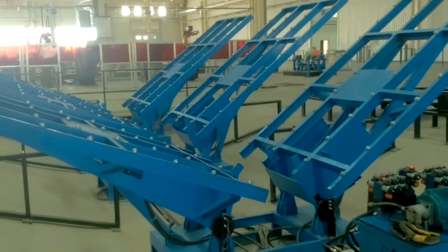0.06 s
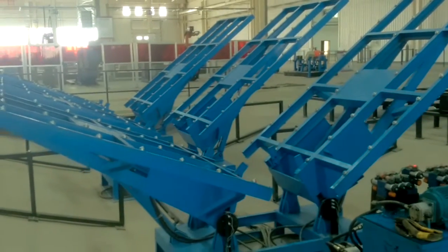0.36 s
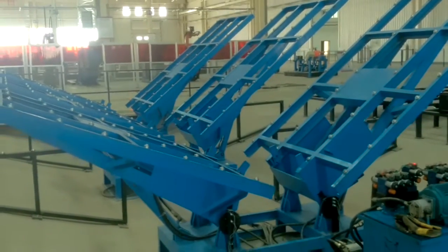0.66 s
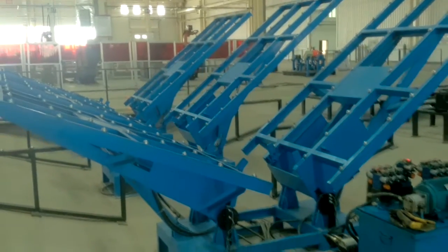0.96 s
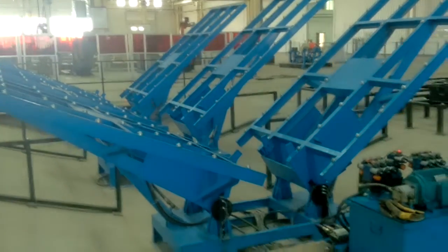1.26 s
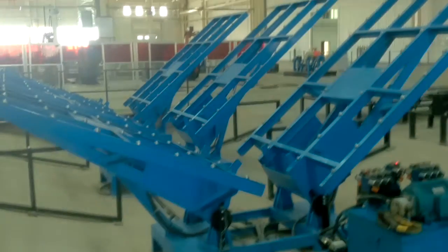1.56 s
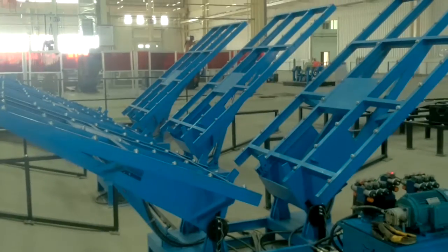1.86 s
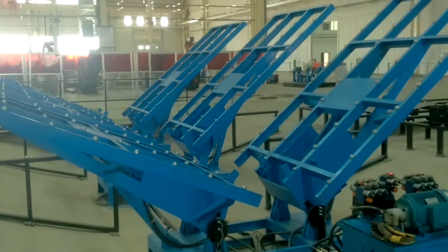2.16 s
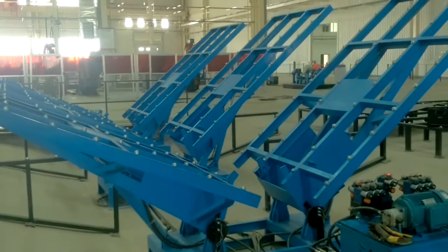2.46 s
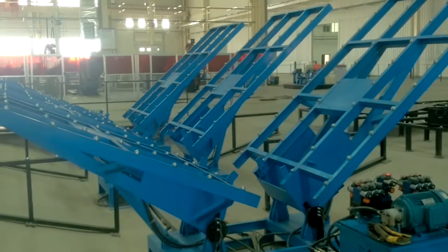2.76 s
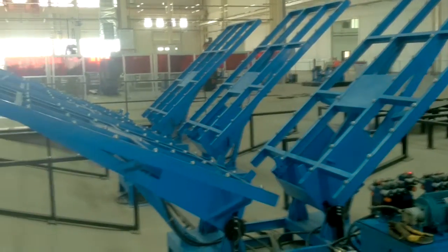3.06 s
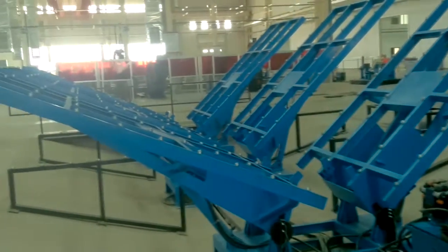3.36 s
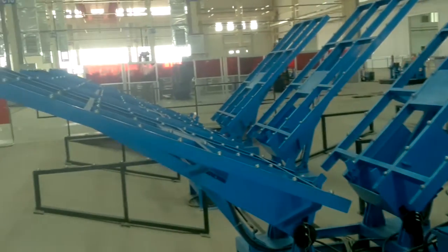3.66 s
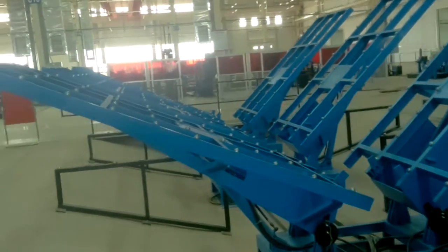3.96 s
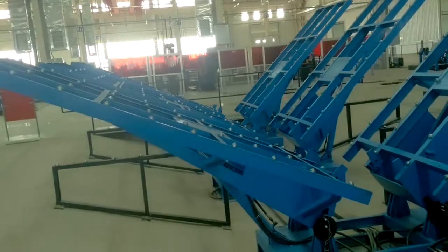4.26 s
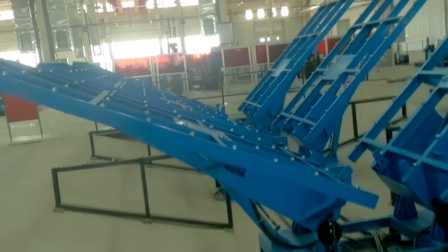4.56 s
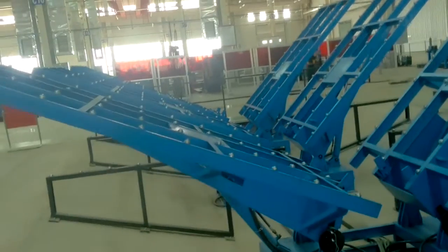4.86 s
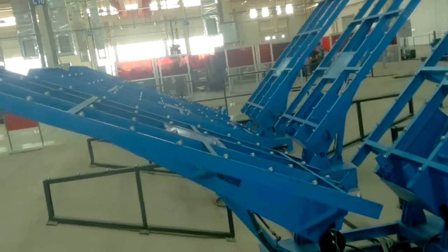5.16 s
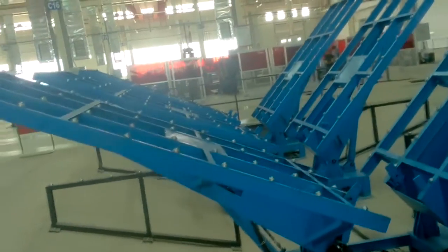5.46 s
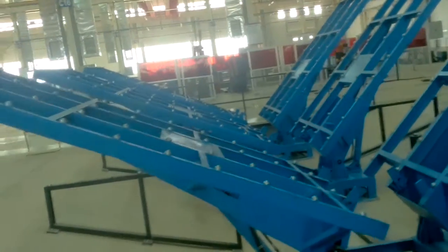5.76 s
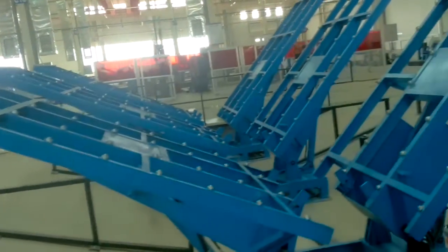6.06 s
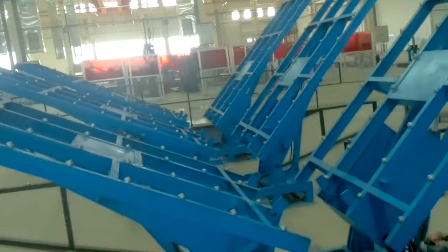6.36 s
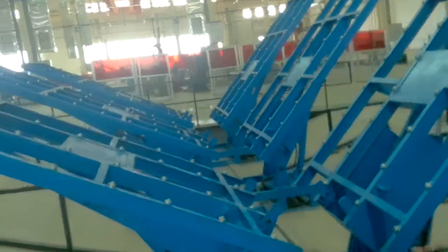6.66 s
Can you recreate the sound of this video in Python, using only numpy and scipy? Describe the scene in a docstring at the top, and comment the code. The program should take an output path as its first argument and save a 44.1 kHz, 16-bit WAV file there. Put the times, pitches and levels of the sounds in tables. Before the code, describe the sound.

The steady whine, hum and hiss of a motor-driven hydraulic pump lifting a steel frame in a factory, interrupted by a low click.

```python
"""Hydraulic power pack in a factory hall

The pack runs steadily while its arms lift a steel frame. A four-pole motor turns a ten-tooth pump:
tooth tones whine over a buzz of shaft orders, oil hisses in spurts, valves and pipes sing.
A hand-held stereo pair edges 0.8 m closer through the hall's standing waves.
One low click strikes the left microphone; a faint one follows on both."""
import sys
import numpy as np
from scipy import signal
from scipy.fft import rfft, irfft, next_fast_len
from scipy.io import wavfile
from scipy.ndimage import uniform_filter1d, map_coordinates

SR = 44100
rng = np.random.default_rng(int(sys.argv[2]) if len(sys.argv) > 2 else 0)


def bounce(signal):
    """Save signal as a 16-bit WAV file at the path given by the first command-line argument."""
    frames = np.transpose(np.atleast_2d(signal))
    limited = np.clip(frames, -1, 1)
    pcm = np.round(limited * 32767).astype(np.int16)
    wavfile.write(sys.argv[1], SR, pcm)


N = 295911
SHAFT_HZ, RISE_HZ_PER_S = 24.62, .0103  # the shaft gains a little speed as the load eases
TOP_HZ = 14300  # band limit of the microphones
SILENT_DB = -120

# the microphones' way towards the pump: t/s, distance covered/m
APPROACH = [(0, 0), (.9, .057), (1.6, .159), (3.1, .191), (3.55, .297), (3.9, .37), (4.3, .39), (4.9, .607),
            (5.5, .705), (6.1, .795), (6.7, .825)]
# likeness of the noise at the two microphones: f/Hz, correlation (-1 to 1)
CORRELATION = [(30, .6), (120, .95), (380, .95), (600, .4), (1000, .55), (1350, .1), (1520, -.8),
               (1760, -.87), (2050, -.15), (3200, .3), (4100, -.1), (7000, 0)]
# room tone of the hall: f/Hz, relative density/dB
ROOM_TONE = [(25, -69), (50, -71), (75, -82), (110, -78.5), (250, -77.5), (370, -74), (540, -83),
             (720, -73.5), (1000, -75.5), (1150, -76), (1300, -75), (1450, -74.5), (1650, -75),
             (2500, -120)]
# low clicks on the microphones: t/s, level/dB, decay/s, low-pass f/Hz, right against left/dB
MIC_CLICKS = [(5.0104, -13.5, .07, 2500, -45), (5.607, -31, .007, 170, -3)]

# valves and pipes singing: centre t/s, length/s, f/Hz, width/Hz, left, right relative density/dB
WHISTLES = [(.45, 1, 4570, 60, -61, -68), (.5, 1.3, 5690, 170, -57, -80), (.65, .5, 4090, 50, -59, -68),
            (1.35, .4, 4560, 120, -66, -63), (1.5, .3, 6820, 60, -55, -80), (1.9, .8, 6270, 150, -64, -66),
            (2.3, 2, 8060, 130, -61, -76), (2.55, 2.5, 5810, 100, -54, -80),
            (2.6, 1.7, 9800, 200, -76, -68), (3.05, .45, 6820, 70, -55, -80),
            (3.65, .6, 9560, 160, -57.5, -80), (3.7, .5, 5690, 160, -57, -76),
            (3.8, 5.5, 5575, 20, -51.5, -68), (5.1, 2.8, 5412, 30, -59, -72),
            (3.8, 5.5, 6295, 40, -59, -70), (4.1, .7, 5830, 90, -57, -76), (4.1, 1.2, 4050, 130, -66, -65),
            (4.2, 1, 10120, 140, -60, -80), (4.3, 3, 9520, 130, -60, -80), (4.6, 1.2, 7980, 400, -73, -69),
            (4.75, .45, 5860, 150, -52, -78), (5.15, .5, 10120, 250, -64, -78),
            (5.25, .8, 8600, 500, -66, -69), (5.4, 1, 4060, 130, -63, -62), (5.55, .35, 5580, 26, -44, -64),
            (5.82, .5, 9590, 240, -53.5, -78), (5.85, .5, 8860, 300, -61.5, -74),
            (6.05, .6, 6120, 250, -57, -66), (6.08, .25, 5600, 130, -53, -63),
            (6.35, .7, 8750, 550, -74, -65), (6.35, .6, 9700, 500, -78, -68),
            (6.55, .5, 6260, 300, -52.5, -74), (6.45, .9, 7200, 900, -64, -74),
            (6.45, .6, 1340, 100, -68, -67), (6.5, .8, 4200, 700, -67, -69)]
# oil rushing through the valves: f/Hz, left, right relative density/dB
OIL_SPECTRUM = [(1610, -79.5, -73), (1710, -57.5, -67), (1780, -73, -73), (2320, -73, -72.5),
                (3030, -69.5, -74.5), (3140, -69, -69.5), (3900, -68.5, -71), (4970, -67, -73),
                (6350, -65.5, -73.5), (6550, -66, -76), (7400, -69, -73.5), (8500, -67.5, -72.5),
                (10130, -69, -74), (13000, -78.5, -69.5), (14100, -88, -84)]
# slow rise of that hiss: t/s, level/dB
OIL_LEVEL = [(0, -1), (1, -1), (3.6, -0.73), (5, 0), (6, 0.8), (6.7, 1.5)]
# peaks and dips of the pipework: f/Hz, width/Hz, left, right gain/dB
PIPE_RESONANCES = [(2720, 90, 3, 2), (2865, 120, -10, -6), (3090, 100, -3, -2), (3340, 120, -3, -2),
                   (4220, 120, -4, -2), (4740, 90, -3, -2), (5300, 200, -2, -3), (5737, 300, 3, 1),
                   (7080, 200, 2, 1), (7700, 300, -1.5, 0), (9530, 170, 2.5, 0), (10150, 230, 3, 1),
                   (11450, 500, 3.5, 1)]
# how the pump beams at the microphones: f/Hz, left, right gain/dB, left, right change/(dB per m)
PUMP_BEAM = [(170, -4, -10, -9, -1), (520, -11, -17.5, 18, 20), (800, 10, -7, -4.5, 3),
             (1270, -3.5, -3.5, -8, -1), (1960, 3.5, 1, -1.5, 6), (3370, -1.5, -2, 1.5, 0),
             (6550, -0.16, 0.5, 2.5, -1), (9840, 1, 0, 3.5, 0.5), (12100, -2, -2.5, 2.5, 0)]

# shaft orders as casing and pipes radiate them: f/Hz, left, right relative level/dB
BUZZ_SPECTRUM = [(300, -70, -72), (560, -66.5, -69), (690, -68, -59), (1150, -70, -54), (1340, -66, -62.5),
                 (1560, -60.5, -59.5), (1680, -56, -70.5), (2000, -53, -60.5), (2310, -60.5, -65),
                 (2600, -64.5, -64.5), (3500, -58.5, -55.5), (3780, -51, -57), (4430, -57, -55.5),
                 (4900, -58, -59.5), (6120, -49.5, -66), (6800, -59, -77), (13600, -65.5, -65.5)]
# phase by which buzz and hum lead at the left microphone: f/Hz, lead/rad
LEFT_LEAD = [(350, 0), (700, .8), (1000, .3), (1300, 1), (1520, 2.8), (1800, 2.8), (2200, 2.2), (3000, 0)]
# scatter of that lead from order to order: f/Hz, spread/rad
LEAD_SCATTER = [(400, .05), (600, .5), (1300, .5), (1520, .15), (1780, .15), (2100, 1.4), (4000, 2.2)]
# motor hum and pump side tones: shaft order, relative level/dB far left, far right, near left, near right
HUM_ORDERS = [(4, -61.0, -61.5, -57.0, -57.5), (5, -55.5, -55.5, -56.5, -57.5),
              (6, -65.5, -65.5, -61.5, -61.5), (8, -61.5, -61.5, -63.0, -63.0),
              (9, -58.0, -59.5, -54.0, -53.5), (11, -63.0, -63.0, -61.5, -62.0),
              (13, -60.0, -62.0, -59.0, -58.0), (14, -54.5, -54.0, -59.5, -58.5),
              (17, -64.5, -61.0, -54.5, -54.0), (18, -60.5, -59.5, -65.5, -64.5),
              (19, -54.0, -50.0, -49.0, -46.0), (20, -59.5, -54.5, -54.0, -50.0),
              (28, -56.5, -59.5, -59.5, -56.5), (29, -59.5, -58.5, -55.0, -53.0), (32, -49, -58, -56, -58),
              (33, -49.5, -52.0, -50.5, -53.5), (35, -56.0, -55.5, -60.0, -57.5),
              (37, -55, -57, -52.5, -51.5), (38, -51.0, -53.0, -51.5, -53.0),
              (39, -53.5, -51.5, -52.0, -55.0), (42, -62.5, -58, -46.5, -48.5),
              (48, -60.0, -53.0, -59.0, -55.5), (51, -58.5, -51.0, -52.0, -49.5),
              (54, -59.0, -56.0, -58.0, -57.0), (55, -64.0, -55.5, -57.0, -49.5),
              (67, -50.5, -51.5, -46.0, -45.5), (68, -47.0, -49.5, -46.5, -46.5),
              (71, -48.0, -52.0, -48.0, -48.0), (73, -47.5, -50.5, -47.5, -47.5),
              (78, -48.5, -54.5, -48.0, -44.5), (80, -50.5, -48.0, -52.5, -43.0),
              (81, -49.5, -48.5, -54.0, -47.0), (83, -47.5, -52.5, -50.0, -46.5),
              (90, -52.0, -57.5, -56.5, -55.0), (93, -47.5, -49.5, -52.0, -52.5),
              (100, -51.0, -55.0, -48.5, -53.0), (101, -53.0, -52.0, -53.5, -54.5),
              (111, -55, -60, -49.5, -52.5), (150, -56, -59, -55, -55), (161, -54, -55, -50.5, -54),
              (164, -53, -55, -47, -53), (166, -51, -57, -47.5, -51), (203, -53, -61, -51, -59),
              (234, -45, -62, -52, -64), (236, -43.5, -62, -47, -62), (238, -52, -64, -44.5, -61),
              (255, -48, -60, -45, -57), (277, -48, -64, -54, -64)]

# tooth tones in the standing waves, named by shaft order: t/s, left, right level/dB, left lead/rad
TOOTH_10 = [(0.0, -41.7, -43.8, -0.3), (0.9, -41.1, -43.4, -0.2), (1.8, -37.6, -39.3, -0.0),
            (4.25, -37.4, -37.9, 0.0), (4.5, -38.4, -39.8, 0.1), (5.15, -36.5, -38.5, -0.0),
            (5.5, -35.7, -36.6, 0.1), (5.8, -36.5, -37.8, 0.2), (6.35, -34.2, -36.8, 0.1),
            (6.69, -31.9, -33.7, 0.0)]
TOOTH_15 = [(0, -49, -48.7, .1), (4, -47, -46.7, .1), (4.65, -53, -51, .1), (4.85, -45, -44, .1),
            (5.1, -47.5, -47, .2), (5.35, -43.5, -42.5, .2), (6.3, -43.3, -42.7, .2), (6.7, -47, -46, .2)]
TOOTH_30 = [(0.01, -36.8, -40.4, 1.1), (1.05, -37.4, -39.9, 0.8), (1.35, -39.2, -42.9, 1.0),
            (3.0, -37.6, -43.5, 1.2), (3.46, -37.5, -39.9, 1.2), (3.91, -41.2, -36.7, 1.6),
            (4.21, -40.0, -38.9, 2.4), (4.5, -39.0, -43.8, 2.1), (4.96, -40.0, -38.8, 2.1),
            (5.25, -36.3, -39.3, 1.8), (5.55, -44.1, -36.4, 1.8), (6.3, -46.6, -45.0, 3.2),
            (6.7, -58.7, -42.8, 3.7)]
TOOTH_40 = [(0.01, -49.6, -38.2, 1.2), (0.3, -41.0, -36.0, 0.2), (0.6, -36.9, -41.2, 0.2),
            (1.05, -37.0, -46.8, 1.1), (1.51, -36.5, -38.8, 0.0), (2.56, -37.4, -40.6, 0.1),
            (3.31, -39.0, -36.5, 0.1), (3.6, -50.1, -36.0, 1.2), (3.75, -40.7, -40.0, 2.6),
            (3.91, -38.5, -46.8, 1.6), (4.21, -45.8, -40.8, -0.0), (4.36, -48.1, -42.8, 2.3),
            (4.5, -37.9, -41.8, 1.3), (4.96, -39.8, -34.9, 1.5), (5.41, -37.7, -42.1, 2.1),
            (5.71, -38.1, -40.7, 1.6), (5.86, -33.6, -37.2, 1.3), (6.7, -35.3, -37.6, 1.0)]
TOOTH_50 = [(0.0, -47.7, -53.3, 1.1), (0.6, -57.9, -52.7, 1.5), (1.2, -53.6, -55.3, 0.1),
            (1.6, -55.9, -49.9, 2.0), (3.1, -49.8, -49.8, 1.6), (4.5, -53.5, -52.1, 0.9),
            (5.0, -61.2, -64.5, 3.5), (5.2, -50.7, -52.0, 2.8), (6.69, -44.6, -41.7, 0.8)]
# the clearest side tones beside them, same columns
SIDE_31 = [(0.01, -45.0, -50.9, 1.0), (2.71, -48.4, -44.9, 1.2), (3.46, -46.4, -46.5, 2.2),
           (4.21, -47.2, -53.5, 2.1), (4.5, -42.4, -53.3, 1.7), (4.8, -45.2, -46.6, 1.4),
           (5.25, -48.1, -50.6, 3.3), (5.86, -50.7, -57.3, 2.8), (6.7, -50.4, -54.2, 8.3)]
SIDE_34 = [(0.01, -49.8, -53.9, 0.6), (3.0, -46.9, -50.9, -0.3), (3.75, -53.2, -54.7, 1.0),
           (3.91, -52.6, -65.8, 0.7), (4.36, -49.1, -52.6, 0.7), (4.96, -47.7, -52.6, 1.1),
           (6.0, -53.6, -56.3, 1.4), (6.7, -49.8, -53.4, 0.3)]
SIDE_36 = [(0.01, -51.6, -48.6, 0.3), (1.05, -49.5, -61.1, 0.6), (2.1, -47.9, -52.0, 0.3),
           (3.46, -53.9, -53.3, 0.0), (4.05, -48.6, -58.6, -5.5), (4.5, -48.5, -55.2, -7.6),
           (5.55, -57.1, -54.8, -3.7), (5.71, -54.5, -58.9, -6.5), (6.7, -48.2, -45.0, -5.5)]
SIDE_41 = [(0.01, -47.8, -53.0, 1.1), (0.6, -54.4, -49.8, 0.8), (2.71, -53.4, -48.1, 0.1),
           (3.91, -52.1, -51.2, 1.5), (4.36, -50.5, -49.0, 0.3), (4.5, -50.4, -52.1, 3.3),
           (4.96, -44.0, -47.3, 0.4), (5.25, -51.4, -50.7, 2.2), (5.86, -44.7, -49.5, 1.3),
           (6.7, -48.8, -50.6, 1.0)]
SIDE_43 = [(0.01, -53.9, -55.4, 1.7), (0.6, -49.7, -45.8, 1.2), (1.96, -51.0, -49.6, 1.4),
           (2.41, -61.5, -50.4, 0.8), (3.31, -48.8, -49.5, 1.3), (4.05, -53.7, -52.0, 1.3),
           (5.41, -46.8, -50.8, 1.6), (6.7, -53.7, -51.6, 0.3)]
SIDE_69 = [(0.01, -40.7, -40.6, -3.2), (0.46, -44.5, -47.0, -3.0), (1.21, -38.6, -41.1, -3.0),
           (2.85, -42.8, -47.1, -3.0), (3.46, -41.4, -41.6, -2.9), (4.66, -46.0, -45.9, -2.8),
           (5.11, -50.3, -50.4, -2.8), (6.16, -38.7, -38.7, -3.1), (6.7, -42.0, -41.9, -2.6)]
# the tones of the whine: shaft order, its course from above
WHINE_TONES = [(10, TOOTH_10), (15, TOOTH_15), (30, TOOTH_30), (31, SIDE_31), (34, SIDE_34), (36, SIDE_36),
               (40, TOOTH_40), (41, SIDE_41), (43, SIDE_43), (50, TOOTH_50), (69, SIDE_69)]


def amp(db):
    """Decibels to gain."""
    return 10 ** (np.asarray(db) / 20)


def unit(x):
    """x at rms 1."""
    return x / np.sqrt(np.mean(x ** 2) + 1e-20)


def along(rows, hz):
    """Each column of a table read on a log-frequency axis."""
    row_hz, *columns = np.transpose(rows)
    return np.array([np.interp(np.log(hz + 1), np.log(row_hz + 1), column) for column in columns])


def curves(rows):
    """One value per sample for each column after the time."""
    times, *columns = np.transpose(rows)
    return np.array([np.interp(np.arange(N) / SR, times, column) for column in columns])


def filtered(x, response):
    """x times a response of frequency."""
    size = next_fast_len(N + SR // 2)
    return irfft(rfft(x, size) * response(np.fft.rfftfreq(size, 1 / SR)), size)[..., :N]


def below(x, edge, order):
    """Smooth fall from 1 to 0, halfway at the edge."""
    return 1 / (1 + (x / edge) ** order)


def bell(x, centre, width, order):
    """A peak of 1 at the centre, with the given full width at half height."""
    return below(np.abs(x - centre), width / 2, order)


def wobble(rate):
    """A smooth random curve, rate knots a second."""
    knots = rng.standard_normal(int(N * rate / SR) + 4)
    return map_coordinates(knots, [np.arange(N) * rate / SR])


def rush(spectrum, patchy_db):
    """Noise in slowly shifting patches, partly alike at the two microphones."""
    def mid_side_gains(hz):
        spread = np.arccos(np.clip(along(CORRELATION, hz)[0], -1, 1)) / 2
        return np.array([np.cos(spread), np.sin(spread)])

    noise = signal.stft(rng.standard_normal((2, N)), nperseg=1024)[2]
    patches = uniform_filter1d(rng.standard_normal(noise.shape[1:]), size=2, axis=0)  # across frequency
    patches = uniform_filter1d(patches, size=36, axis=1)  # across time
    patch_gain = unit(amp(patchy_db * unit(patches)))
    pair = signal.istft(noise * patch_gain, nperseg=1024)[1][:, :N]
    mid, side = filtered(pair, mid_side_gains)
    left_right = np.array([mid + side, mid - side])
    return filtered(left_right, lambda hz: amp(along(spectrum, hz)) * np.sqrt(SR / 2))


def hall_murmur(travel, level_db=-1.7, db_per_m=.5):
    """The hall's low room tone, slightly louder towards the pump."""
    return amp(level_db + db_per_m * travel) * rush(ROOM_TONE, patchy_db=2.5)


def mic_clicks():
    """A sudden step at the microphone leaks away and swings slowly back."""
    out = np.zeros((2, N))
    for start, db, decay, bright_hz, right_db in MIC_CLICKS:
        age = (np.arange(N) / SR - start) / decay
        step = (age > 0) * (1 - age) * np.exp(-np.abs(age))
        out += amp([[db], [db + right_db]]) * filtered(step, lambda hz: below(hz, bright_hz, order=2))
    return out


def whistles(level_db=-1.8):
    """Narrow resonances of valves and pipes, stirred by the flow, swell and fade."""
    hz, t, noise = signal.stft(rng.standard_normal((2, N)), SR, nperseg=2048)
    power = np.zeros(noise.shape)
    for centre_s, length, centre_hz, width, *sides_db in WHISTLES:
        swell = np.outer(bell(hz, centre_hz, width, order=3), bell(t, centre_s, length, order=6))
        power += np.multiply.outer(amp(sides_db), swell) ** 2
    return amp(level_db) * signal.istft(noise * np.sqrt(power * SR / 2), nperseg=2048)[1][:, :N]


def oil_hiss(low_cut_hz=1400):
    """Oil rushes through the valves, a little louder towards the end."""
    noise = rush(OIL_SPECTRUM, patchy_db=2.1)
    return amp(curves(OIL_LEVEL)) * filtered(noise, lambda hz: 1 - below(hz, low_cut_hz, order=12))


def oil_spurts(angle, tooth_depth=.38, sharpness=2.5, shaft_depth=.2, flutter_db=.25):
    """Gain of the hiss: each of the ten teeth pushes a spurt of oil; the spurts swell once a turn."""
    tooth = ((1 + np.cos(10 * angle)) / 2) ** sharpness
    shaft = ((1 + np.cos(angle - 1.2)) / 2) ** 2
    flutter = amp(flutter_db * wobble(rate=35))
    return unit((1 + tooth_depth * tooth) * (1 + shaft_depth * shaft) * flutter)


def pipework(hz):
    """Gain of the pipework's resonances at each microphone."""
    return amp(sum(np.outer(sides_db, bell(hz, centre, width, order=2))
                   for centre, width, *sides_db in PIPE_RESONANCES))


def pump_beam(x, travel, sway_db=.35):
    """The pump's colour passes from far to near as the hand-held pair sways closer."""
    def heard_after(metres):
        return filtered(x, lambda hz: amp(along(PUMP_BEAM, hz)[:2] + metres * along(PUMP_BEAM, hz)[2:]))

    nearness = travel / travel.max()
    sway = amp(sway_db * np.array([wobble(rate=7), wobble(rate=7)]))
    return sway * ((1 - nearness) * heard_after(0) + nearness * heard_after(travel.max()))


def shaft_orders(angle, travel, far_db, near_db, drift_rad, shift_db, places, turn_size=8192):
    """Shaft orders repeat one pattern every turn; the hall reshuffles it along the microphones' path."""
    hz = np.arange(1, far_db.shape[1] + 1) * SHAFT_HZ
    # each microphone stands at its own place in the standing waves
    lead = along(LEFT_LEAD, hz) + along(LEAD_SCATTER, hz) * rng.standard_normal(len(hz))
    phase = rng.uniform(0, 2 * np.pi, len(hz)) + lead * [[.5], [-.5]]
    sensitivity = np.sqrt(hz / TOP_HZ)  # short waves change fastest as the microphones move
    place = travel / travel.max() * (places - 1)
    turn_index = angle / (2 * np.pi) % 1 * turn_size
    out = np.zeros((2, N))
    for i in range(places):
        phase = phase + drift_rad * sensitivity * rng.standard_normal(len(hz))
        level_db = far_db + (near_db - far_db) * i / (places - 1)
        gain = amp(level_db + shift_db * sensitivity * rng.standard_normal(phase.shape))
        spectrum = np.pad(gain * np.exp(1j * phase), ((0, 0), (1, 0)))
        one_turn = irfft(spectrum, turn_size) * turn_size / 2
        here = np.abs(place - i) < 1
        crossfade = 1 - np.abs(place[here] - i)
        turning = [np.interp(turn_index[here], np.arange(turn_size), side) for side in one_turn]
        out[:, here] += crossfade * np.array(turning)
    return out


def tooth_buzz(angle, travel, uneven_db=2.2, tooth_db=1):
    """Unequal teeth fill in the shaft orders between those of the whine and the hum."""
    orders = np.arange(1, int(TOP_HZ / SHAFT_HZ))
    levels = along(BUZZ_SPECTRUM, orders * SHAFT_HZ) + uneven_db * rng.standard_normal(len(orders))
    levels += tooth_db * (orders % 10 == 0)  # multiples of the tooth rate stand out
    levels[:, np.isin(orders, [row[0] for row in WHINE_TONES + HUM_ORDERS])] = SILENT_DB
    return shaft_orders(angle, travel, levels, levels, drift_rad=1.1, shift_db=6, places=20)


def motor_hum(angle, travel, level_db=-.67):
    """The clear side tones of motor and pump, each swelling and fading along the microphones' path."""
    levels = np.full((4, int(TOP_HZ / SHAFT_HZ)), SILENT_DB, dtype=float)
    for order, *dbs in HUM_ORDERS:
        levels[:, order - 1] = dbs
    far, near = levels[:2], levels[2:]
    return amp(level_db) * shaft_orders(angle, travel, far, near, drift_rad=.8, shift_db=4.5, places=12)


def pump_whine(angle, waver_db=.7, beat_hz=366.4, beat_db=-60):
    """Each pump tone swells, dips and turns in phase as the microphones cross its standing wave."""
    out = np.zeros((2, N))
    for order, course in WHINE_TONES:
        left_db, right_db, lead = curves(course)
        waver = waver_db * np.sqrt(order * SHAFT_HZ / 1000) * wobble(rate=9)  # higher tones waver more
        phase = order * angle + lead * [[.5], [-.5]] + rng.uniform(0, 2 * np.pi)
        out += amp(np.array([left_db, right_db]) + waver) * np.cos(phase)
    # a faint steady tone beats against order 15
    return out + amp(beat_db) * np.sin(2 * np.pi * (beat_hz * np.arange(N) / SR + rng.uniform()))


def scene():
    """The shaft drives whine, hum, buzz and spurts; the microphones close in; the hall murmurs beneath."""
    angle = 2 * np.pi * np.cumsum(SHAFT_HZ + RISE_HZ_PER_S * np.arange(N) / SR) / SR
    travel, = curves(APPROACH)
    buzz_and_hiss = tooth_buzz(angle, travel) + oil_spurts(angle) * oil_hiss()
    pump = pump_beam(filtered(buzz_and_hiss, pipework), travel) + whistles()
    hall = hall_murmur(travel)
    return pump_whine(angle) + motor_hum(angle, travel) + pump + hall + mic_clicks()


def record(dry):
    """The microphones pass nothing above their band limit."""
    return filtered(dry, lambda hz: hz < TOP_HZ)


dry = scene()
out = record(dry)
bounce(out)
```